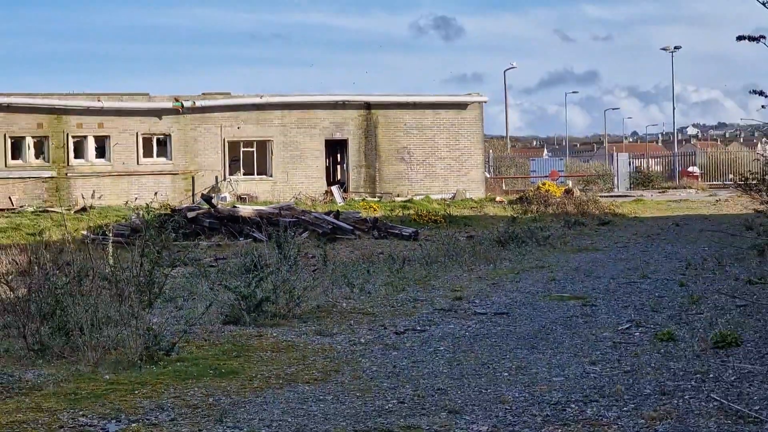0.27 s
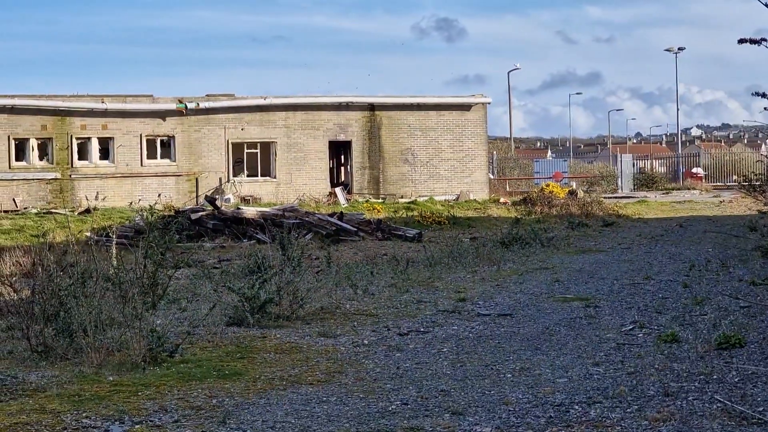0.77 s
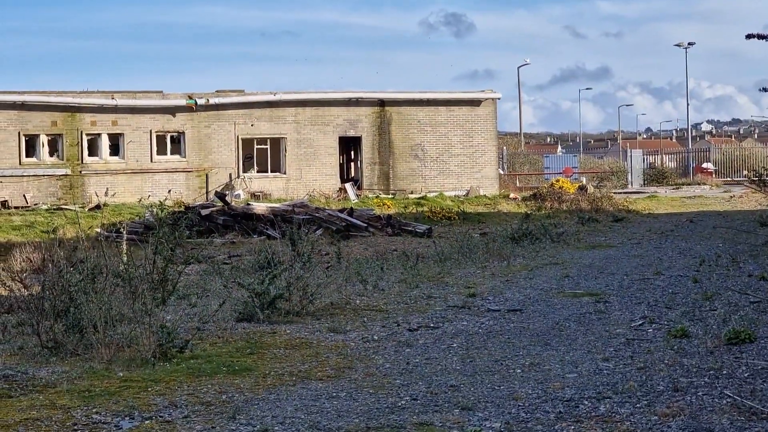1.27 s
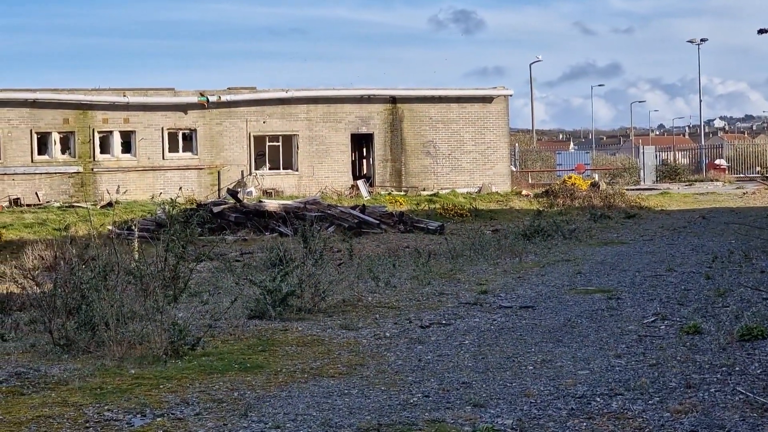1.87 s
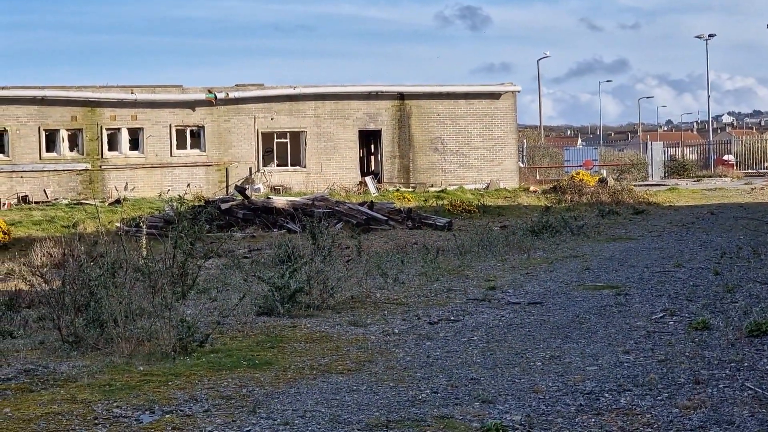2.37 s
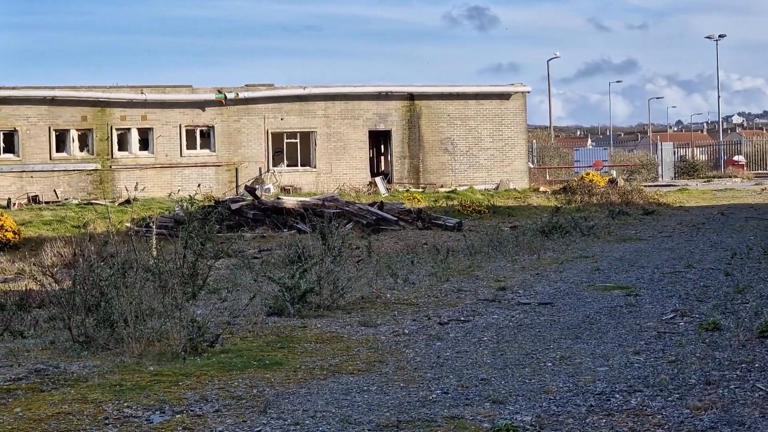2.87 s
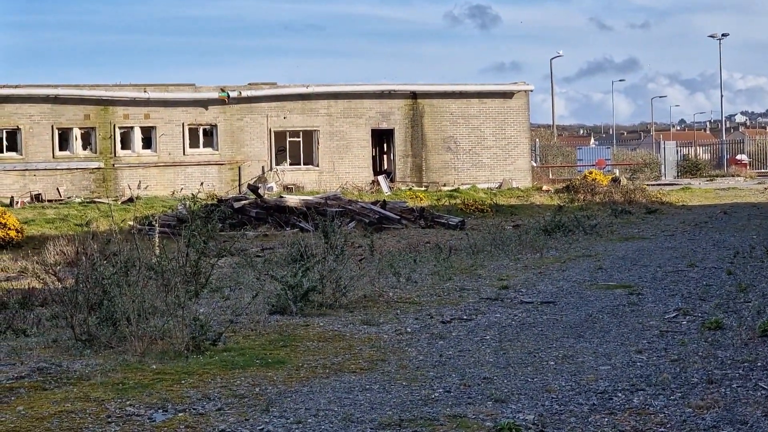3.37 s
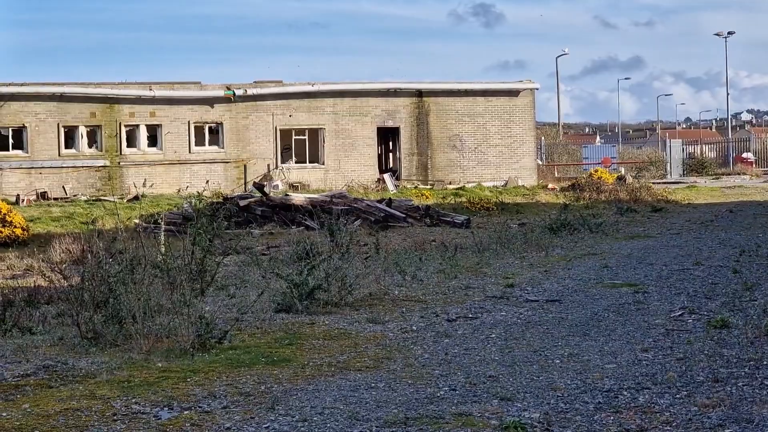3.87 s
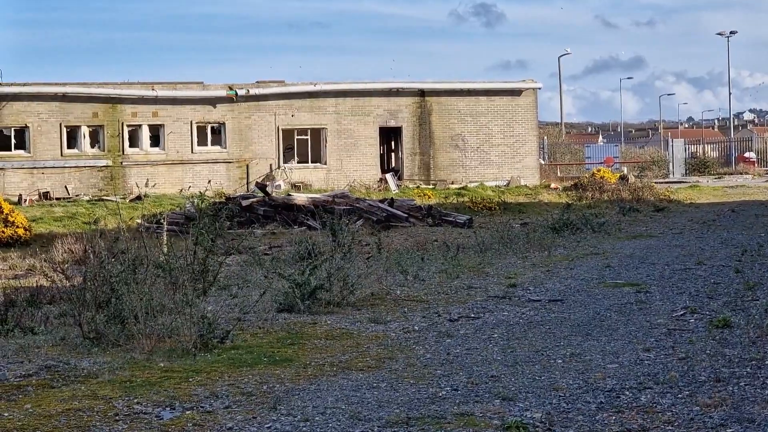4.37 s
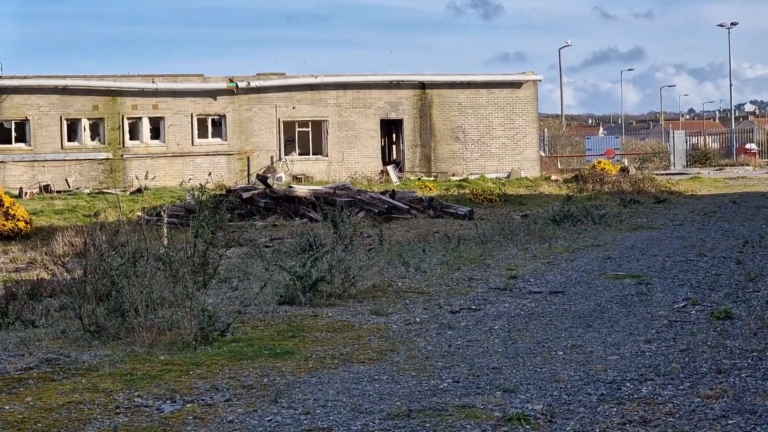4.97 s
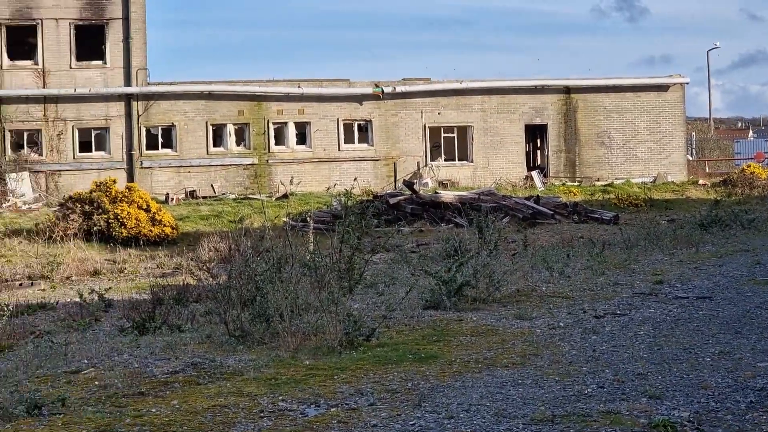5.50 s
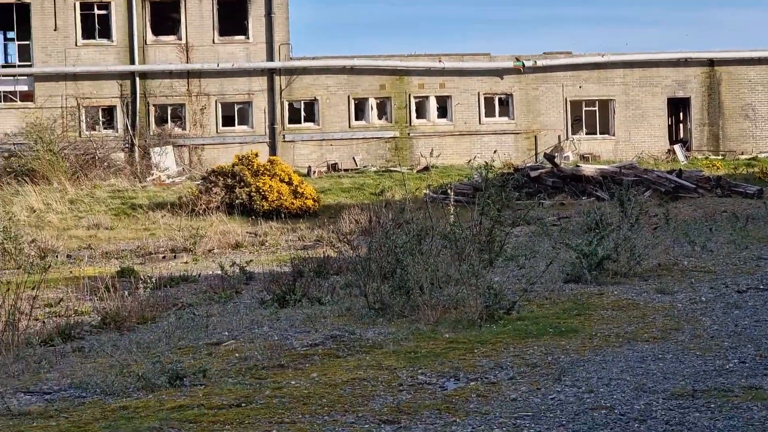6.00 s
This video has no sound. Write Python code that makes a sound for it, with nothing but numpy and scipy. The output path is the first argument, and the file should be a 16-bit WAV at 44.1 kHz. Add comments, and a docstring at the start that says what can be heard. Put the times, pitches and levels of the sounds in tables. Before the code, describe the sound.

A windy open yard beside derelict buildings, heard from a hand-held stereo phone. Low, uneven wind rumble starts immediately, with soft thumps jumping between left and right, and a faint distant shore wash beneath. From about 0.2 s gulls cry in a dense, restless chatter: short harmonic yelps that leap up, sometimes crack, then slide down, each a fraction of a second. Low, nearly pure clucks and grainy rasps fill the gaps, with many fainter birds behind and a short echo from the walls. Strong cries cluster around 1.7 to 3.5 s. A dull tap lands on the case near 0.6 s, another at 3.6 s, and two hard, clicky knocks at 4.5 to 4.6 s. Cloth hiss at the right is more noticeable after 3.9 s. Small muffled taps continue from 5 s; the last yelps come near 5.8 s, then clucks and wind to the end, just after 6 s.

```python
"""Dozens of gull cries from derelict roofs, off to the left of a hand-held phone.
From the start wind rumbles and thumps at both microphone ports, cloth hisses by the right one on and off,
and a far shore washes underneath. From about 0.2 s the gulls cry: harmonic voices leap up and slide down,
with low clucks, noisy rasps, fainter far birds and wall echoes. Decaying sines and noise make the taps on
the case, which start near 0.6 s; two hard ones come near 4.6 s. After the last cries, near 5.8 s, clucks end it."""
import sys
import numpy as np
from scipy import signal
from scipy.fft import rfft, irfft
from scipy.io import wavfile
from scipy.ndimage import uniform_filter1d

SR = 44100
rng = np.random.default_rng(int(sys.argv[2]) if len(sys.argv) > 2 else 0)


def inscribe(sig):
    """Save sig as 16-bit PCM at rate SR to the path in sys.argv[1].

    A 1-D sig is mono; a 2-D sig holds one channel per row.
    Samples are clipped to [-1, 1] before scaling.
    """
    pcm = np.round(np.clip(np.atleast_2d(sig).T, -1, 1) * 32767)
    wavfile.write(sys.argv[1], SR, pcm.astype(np.int16))


N = 275175
T = np.arange(N) / SR

# Near cries, levels before the stress and the throat filter: start_s, climb_ms, slide_ms, start_hz,
# break_hz (sudden jump up into the top), top_hz, drop_hz (quick fall after the top), end_hz,
# fundamental_top_db, fundamental_end_db, overtones_minus_fundamental_top_db and _end_db,
# third_minus_second_partial_db, higher_partials_minus_overtones_db
NEAR_CRIES = [ (.185, 31, 240, 1327, -1, 1421, 1.5, 961, -53, -47, 1.5, -19.5, -3, -21.5),
              (0.273, 3.6, 177, 1354, -3, 1315, 9.5, 1191, -61.5, -70, 12.5, 12, -18, -47),
              (.395, 35, 194, 1311, 208, 1601, 113.5, 1150, -44, -54.5, -21, -3.5, -3, -17),
              (0.498, 4, 69, 1615, 0, 1620, 2, 1457, -58, -54, -13, -13.5, 5, -17),
              (0.563, 3.9, 64, 1182, -4, 1218, -2, 957, -55.5, -48, -1.5, -13, 2, -30),
              (.61, 21, 60, 1488, 0, 1528, -2, 1356, -41.5, -49.5, -18, -5.5, -2.5, -14.5),
              (0.703, 45, 131, 1250, -4.5, 1546, 66.5, 1208, -41, -57, -11, 1, 0, -19),
              (0.918, 2.6, 71, 1211, 9, 1236, -2.5, 1145, -52, -54.5, -5.5, 3, -7.5, -19),
              (1.001, 2.7, 99, 1266, 6, 1273, 3, 1178, -52.5, -61.5, -8, -1, -3.5, -33),
              (1.12, 32, 245, 1273, 257, 1632, 148, 1147, -43, -61.5, -14, -12, -0.5, -19),
              (1.562, 50, 130, 1194, 2, 1544, 42, 1267, -46.5, -48, -7.5, -6, -3, -23.5),
              (1.765, 33, 148, 1275, 183, 1559, 89.5, 1271, -38, -46, -8.5, -15.5, -1.5, -18.5),
              (1.838, 5.6, 70, 1247, -2, 1247, -6.5, 1180, -65, -63.5, 10.5, 10.5, -1, -35),
              (1.957, 68, 232, 931, -2, 1533, 133, 1090, -40, -53.5, -7.5, -3, -2.5, -19.5),
              (2.294, 41, 110, 1244, 87, 1358, -9.5, 1240, -44.5, -45.5, -9, -5, -11, -25),
              (2.348, 27, 83, 1446, 3.5, 1546, 54.5, 1373, -42, -46.5, -11, 1.5, -5.5, -24),
              (2.46, 35, 196, 1255, 248, 1590, 156.5, 1169, -36.5, -55.5, -14, 3, -0.5, -20.5),
              (2.545, 45, 130, 1134, 128, 1386, 1, 1199, -49, -56.5, -2, -3, -7, -27),
              (2.737, 30, 184, 900, 6, 1387, 34.5, 1128, -40, -46.5, -5, -1.5, -6, -25.5),
              (2.972, 53, 160, 1226, 79, 1353, -28, 1190, -37.5, -54.5, -12, 1.5, -6, -23.5),
              (3.054, 30, 137, 1458, 0, 1526, 3, 1322, -42.5, -46, -16, -4, 0.5, -16),
              (3.322, 25, 81, 1374, 4, 1405, 24.5, 1260, -46, -51, -14, -11, -1, -17),
              (3.328, 32, 69, 1296, 242.5, 1578, 114, 1374, -42, -45, -18, -19.5, -2.5, -23),
              (3.432, 5, 190, 1320, 3.5, 1345, -1.5, 1117, -45.5, -52.5, -9, -8.5, 1, -33),
              (3.655, 51, 164, 1253, 85, 1382, -2, 1210, -42, -49.5, -16, -3, -6, -24.5),
              (4.138, 45, 5.4, 915, -3.5, 1355, -4, 1536, -46, -45, -3.5, -6.5, -12, -23),
              (4.19, 4.7, 125, 1291, 0, 1330, -1.5, 1078, -48, -51, 0.5, -5.5, 1, -31),
              (4.244, 42, 135, 1181, 149, 1602, 139, 1242, -44.5, -49.5, -15.5, -3.5, -6, -13.5),
              (4.42, 3, 181, 1482, 2, 1462, 75, 1160, -44.5, -56, -9, -2.5, -4.5, -26),
              (4.917, 23, 73, 883, -2, 1385, 5, 1294, -49.5, -38.5, -14.5, -17, -1.5, -22),
              (4.983, 35, 65, 927, -0.5, 1265, 24, 1201, -49, -52.5, -11.5, 7.5, -11.5, -26),
              (5.02, 25, 189, 1552, 1.5, 1510, 113.5, 1169, -42.5, -59.5, -15, -6, -4.5, -14),
              (5.311, 2.6, 12, 1143, 0, 1192, -1, 1205, -53, -64, 5, 2, 7, -28),
              (5.337, 4.6, 56, 1430, 1, 1422, 3, 1335, -53.5, -47.5, -31, -23, -15, -4),
              (5.382, 17, 5.2, 1160, 6.5, 1165, 6, 1166, -64, -63.5, 10.5, 9, 9, -19),
              (5.411, 5.2, 70, 1636, 8, 1615, 86, 1423, -51.5, -58, -22, -24, -1, -3),
              (5.419, 4.4, 65, 1413, 4, 1385, 9, 1275, -53, -49.5, -24, -28, -6, -3),
              (5.699, 51, 174, 1181, 255.5, 1582, 132.5, 1159, -45, -47.5, -12, -7.5, -3, -12),
              (5.76, 34, 4.6, 1162, 2.5, 1255, 0, 1305, -43, -48, -3, -12, 2, -24), ]
# What a bird's throat and beak let through: pitch_hz, gain_db
THROAT_FILTER = [(350, -14), (650, 1.5), (1300, 1), (1900, 1.5), (2600, 0.5), (3250, 5.5), (4000, 0.5),
                 (4700, 1), (5500, 1), (6400, -3), (7300, 0.5), (8800, -12.5), (16000, -48.5)]
LEFT_LEAD_MS = 0.2  # usual time by which the left port hears the birds first
SCRATCH_S = .012  # scratchy lead-in before each voice


def undb(db):
    """Turn decibels into a plain factor."""
    return 10 ** (np.asarray(db) / 20)


def level(x, db):
    """Scale a sound to an average (rms) level in dB."""
    return x * undb(db) / np.sqrt(np.mean(x ** 2))


def colour(x, points):
    """Filter along the last axis by (Hz, dB) points joined on a log axis; outside them nearly nothing passes."""
    hz, db = np.transpose(points)
    f = np.maximum(np.arange(x.shape[-1] // 2 + 1) * SR / x.shape[-1], 1)
    gain_db = np.interp(np.log(f), np.log(hz), db, left=-90, right=-90)
    return irfft(rfft(x) * undb(gain_db), x.shape[-1])


def walk(rate, size=N):
    """Random wandering: values held for 1 / rate seconds and smoothed twice; spread near 1."""
    hold = int(SR / rate)
    steps = np.repeat(rng.standard_normal(size // hold + 1), hold)
    return 1.45 * uniform_filter1d(uniform_filter1d(steps, hold), hold)[:size]


def add(track, sound, s):
    """Mix a sound into a track from time s on."""
    i = max(int(s * SR), 0)
    track[..., i:i + sound.shape[-1]] += sound[..., :track.shape[-1] - i]


def ports_apart(pan_db):
    """Gains of the left and right port that differ by pan_db."""
    return undb(np.array([[pan_db], [-pan_db]]) / 2)


def shore():
    """A faint, unsteady, quickly wavering wash of surf and town: filtered noise partly shared by the ports."""
    # Tone of the wash: pitch_hz, density_db_per_hz (relative)
    wash_colour = [(88, -19.5), (150, -5), (464, -19), (881, -11.5), (1110, -20), (1280, -7.5), (1850, -25),
                   (3650, -34), (7490, -45), (9840, -57), (15700, -49.5)]
    wash = colour(rng.standard_normal((2, N)) + .5 * rng.standard_normal(N), wash_colour)
    waver_db = walk(0.26) + 2.82 * walk(4.014)
    return level(wash * undb(waver_db), -55)


def wind(shared=0.44, eddy_db=2.0, pop_db=3.5):
    """Eddies pound the two ports, partly together; the higher flapping comes in sharper pops."""
    # Gusts: time_s, level_db (below 130 Hz), left_minus_right_db, flapping_minus_level_db (above 130 Hz)
    gusts = [(0.0, -46, 17.5, 5.5), (0.15, -30, -5.5, -10.5), (0.29, -37.5, 8, -22.5),
             (0.55, -34, 5.5, -11.5), (0.709, -30, -0.5, -19.5), (1.0, -42, 0.5, -26),
             (1.29, -30.5, -9.5, -15.5), (1.35, -43.5, -4, -10), (1.78, -34.5, 1.5, -23),
             (2.14, -37.5, -2, -17.5), (3.19, -33, -0.5, -22), (3.33, -28.5, 10, -20),
             (3.43, -37, -12, -23), (3.52, -41.5, 22.5, -22), (3.83, -36.5, -11.5, -9),
             (3.95, -31, -4, -6.5), (4.16, -52.5, -1, -7.5), (4.3, -33, 1, -7), (4.33, -40, 6.5, -19),
             (4.59, -31, 2.5, -12), (4.83, -40.5, 0, -39), (4.87, -34, 5.5, -18), (5.18, -35, -6, -9),
             (5.3, -29.5, 10, -19.5), (5.4, -34, 14.5, -13), (5.47, -34, -1.5, -2.5),
             (5.82, -38, -11.5, -15.5), (5.939, -37.5, 19, -14), (6.11, -27.5, 6, -15),
             (6.2, -37.5, -5.5, -1.5)]
    # Tone of the pressure noise: pitch_hz, density_db_per_hz (relative)
    buffet_colour = [(8.8, -42), (15, -14.5), (48, 1), (78, 0.5), (112, -5), (355, -38), (600, -50),
                     (780, -70.5), (1320, -120)]
    s, *columns = np.transpose(gusts)
    db, pan_db, flapping_db = (np.interp(T, s, c) for c in columns)
    together = np.sqrt(shared) * rng.standard_normal(N)
    apart = np.sqrt(1 - shared) * rng.standard_normal((2, N))
    air = colour(together + apart, buffet_colour)
    eddies = 0.4 * walk(25) + np.array([walk(25), walk(24.954)])
    low = signal.sosfiltfilt(signal.butter(4, 130, fs=SR, output="sos"), air)
    rumble = level(low * undb(eddy_db * eddies), 0)
    flapping = level((air - low) * undb(pop_db * eddies), 0) * undb(flapping_db)
    return (rumble + flapping) * undb([db + pan_db / 2, db - pan_db / 2])


def thumps():
    """Single hard eddies thump the ports: each is little more than one swing of pressure."""
    # Thumps: time_s (middle), peak_db (about, mean of both ports), pitch_hz, left_minus_right_db
    eddy_hits = [(0.069, -22.5, 88.5, 19), (0.164, -27, 62.6, 6), (0.591, -18, 97, 0),
                 (0.679, -18.5, 89, -28), (1.276, -22, 69.5, 3), (1.761, -24, 80.5, 6),
                 (1.863, -24, 86, 18), (2.614, -24, 69.5, 12), (2.771, -24, 84, -10),
                 (3.087, -22, 79.7, -12), (3.579, -23.5, 79.5, 9), (3.978, -24.5, 88, 12),
                 (4.284, -19.5, 78.6, 8), (4.55, -18.5, 79.5, 5), (4.599, -24.5, 76, 18),
                 (5.049, -22.5, 130, 10), (5.17, -26, 85, -20), (5.286, -26, 80, 24),
                 (5.475, -25.5, 99, -10), (6.099, -21, 72, 6)]
    width_cycles = 0.38  # width of the bell-shaped swell
    out, t = np.zeros((2, N)), np.arange(-2048, 2048) / SR
    for s, db, hz, pan_db in eddy_hits:
        bell = np.exp(-.5 * (t * hz / width_cycles) ** 2)
        swing = np.cos(2 * np.pi * (hz * t + rng.random())) * bell
        ports = ports_apart(pan_db)
        add(out, swing * undb(db) * ports / ports.mean(), s + t[0])
    return out


def rustle(left_db=-10, grain_db=1.5):
    """Cloth fibres slide past the right port: broad hiss with a fine grain, weaker on the left."""
    # Strength of the rubbing: time_s, level_db (band 11.5 to 15.5 kHz, mean of the two ports)
    rubbing = [(0.0, -84), (0.65, -99), (0.79, -79), (0.91, -76), (1.25, -100), (1.35, -80), (1.74, -89),
               (1.86, -82), (2.03, -84), (2.17, -94.5), (2.97, -106), (3.15, -82.5), (3.56, -95),
               (3.88, -77), (3.98, -95), (4.12, -72.5), (4.21, -76), (4.24, -85), (4.31, -76.5),
               (4.75, -72.5), (4.8, -82.5), (5.349, -80.5), (5.42, -77.5), (5.64, -90.5), (5.78, -72.5),
               (6.07, -91.5), (6.14, -109)]
    # Tone of the hiss: pitch_hz, density_db_per_hz (relative)
    cloth_colour = [(300, -20.5), (2000, 8.5), (6000, 0), (9000, -6), (10500, -14.5), (12000, -6.5),
                    (15500, -5.5)]
    s, db = np.transpose(rubbing)
    grainy = rng.standard_normal((2, N)) * undb(grain_db * walk(300))
    hiss = colour(grainy, cloth_colour) * undb([[left_db], [0]])
    top_band = colour(hiss.mean(axis=0), [(11500, 0), (15500, 0)])
    return hiss / top_band.std() * undb(np.interp(T, s, db))


def taps():
    """Fingers tap the case: each tap is a dull thud, a short knock and a sharp tick that die away fast."""
    # Taps, strengths before the fades: time_s, knock_db, thud_db, tick_db, left_minus_right_db
    finger_taps = [(0.556, -43, -31, -66, -1), (3.6055, -50, -33.5, -64, -1), (3.8644, -73, -60, -52, 10),
                   (4.5315, -33.5, -32.5, -41.5, -5), (4.6315, -28.5, -40, -33, -7),
                   (4.97, -70, -54, -56, -10), (5.1737, -56, -33, -65, -12), (5.897, -50, -42, -68, -6),
                   (5.468, -61, -36, -62, 11), (5.5553, -61, -29.5, -70, -2), (5.9546, -63, -38, -68, -24),
                   (6.0744, -62, -35, -70, 0), (5.742, -54, -32, -70, -6), (5.915, -67, -37, -70, 1.5)]
    out, t = np.zeros((2, N)), np.arange(1024) / SR
    thud = np.sin(2 * np.pi * 420 * t) * np.exp(-t / 0.00089) * (1 - np.exp(-t / 0.00013))
    knock = np.sin(2 * np.pi * 3000 * t) * np.exp(-t / 0.00048)
    for s, knock_db, thud_db, tick_db, pan_db in finger_taps:
        noise = 0.17 * rng.standard_normal(len(t))
        tick = (np.sin(2 * np.pi * 6100 * t) + noise) * np.exp(-t / 0.00063)
        tap = undb(thud_db) * thud + undb(knock_db) * knock + undb(tick_db) * tick
        add(out, tap * ports_apart(pan_db), s)
    return out


def yard(dry, t60_s=0.36, yard_db=-13.5):
    """Walls and ground scatter the cries into a short tail of fading noise, thin in the lows, unlike at each port."""
    t = np.arange(int(.8 * SR)) / SR
    tail = rng.standard_normal((2, len(t))) * undb(-60 * t / t60_s) * (t > .015)
    tail = colour(tail, [(300, -21.5), (2000, -8.0), (4000, -8.0), (16000, -6.5)])
    tail *= undb(yard_db) / np.sqrt(np.sum(tail ** 2, axis=1, keepdims=True))
    return signal.fftconvolve(dry, tail, axes=1)[:, :N]


def echoed(sound, db, count=4):
    """Add a few close echoes, 4 to 22 ms late; they notch a sliding partial into pieces. Energy is kept."""
    lags = (SR * .004 * 5.5 ** rng.random((count, 2))).astype(int)
    out = np.pad(sound, ((0, 0), (0, lags.max())))
    for pair in lags:
        for side, lag in enumerate(pair):
            out[side, lag:lag + sound.shape[1]] += undb(db) / 2 * sound[side]
    return out * np.sqrt(np.sum(sound ** 2) / np.sum(out ** 2))


def cry(rows, third_db, upper_db, lead_ms, count=6, wobble=0.0045, hoarse=0.049, flutter_db=2.5,
        over_flutter_db=3.5, upper_flutter_db=6.0, scratch_db=-12, breath_db=-21):
    """A harmonic voice: the syrinx scratches before it locks and in fast leaps; the left port hears it first."""
    # Offsets of partials 4 to 7 from the higher-partials level: gain_db
    upper_offsets = [1.5, -1.5, -6, -8]
    s, *columns = np.transpose(rows)
    t = np.arange(s[0] - SCRATCH_S, s[-1] + 0.015, 1 / SR)
    hz, db, over_db = (uniform_filter1d(np.interp(t, s, c), 200, mode="nearest") for c in columns)
    loose = np.clip((s[0] - t) / 0.0047 + 1, 0, 1)
    leap = np.clip(np.gradient(np.log(hz)) * SR / 12, 0, 1)
    over_db = over_db - 9 * leap

    # unlocked membranes: the cycle timing stumbles, which smears every partial into noise
    stumble = (hoarse + .4 * np.maximum(loose, leap)) * walk(700, size=len(t))
    # the pitch scoops up into the note
    scoop = 1 - .07 * np.clip((s[0] + .004 - t) / SCRATCH_S, 0, 1)
    hz = hz * scoop * (1 + wobble * walk(149.8, size=len(t)))
    # the birds sit at slightly different bearings
    right_delay_s = (lead_ms + 0.023 * rng.standard_normal()) / 1000
    cycles = np.cumsum(hz) / SR - np.outer([0, right_delay_s], hz) + rng.random()
    phase = 2 * np.pi * cycles + stumble

    tone = np.sin(phase) * undb(flutter_db * walk(37.1, size=len(t)))
    # partials 2 and 3 share the overtone level between them
    second_db = -10 * np.log10(1 + undb(2 * third_db))
    shares_db = [second_db, second_db + third_db, *(upper_db + np.array(upper_offsets))]
    for k, share_db in enumerate(shares_db[:count]):
        depth_db = over_flutter_db if k < 2 else upper_flutter_db
        partial_db = over_db + share_db + depth_db * walk(47.3, size=len(t))
        tone += np.sin((k + 2) * phase) * undb(partial_db)
    # air puffs through the membranes once a cycle, as strong as the overtones allow
    puff = uniform_filter1d(rng.standard_normal(len(t)), size=8)
    tone += puff * (1 + np.sin(phase)) * undb(over_db + breath_db)

    fade = np.clip(np.minimum((t - t[0]) / .024, (t[-1] - t) / .02), 0, 1)
    ports = ports_apart(.8 * rng.standard_normal())
    return np.sqrt(2) * tone * fade * undb(db + scratch_db * loose) * ports


def far_birds(count=190, loudest_db=-57.0, over_db=-9):
    """Many fainter cries cluster around the starts of the near ones: each leaps up, then slides down."""
    out = np.zeros((2, N))
    for who, wait, pitch, long, faint in rng.random((count, 5)):
        hz, length_s = 800 * 1.85 ** pitch, .05 + .15 * long
        db = loudest_db - 10 * faint
        rows = [(0, .93 * hz, db - 3, over_db),
                (.15 * length_s, hz * 1.05, db, over_db),
                (length_s, .85 * hz, db - 4, over_db)]
        near_start_s = NEAR_CRIES[int(who * len(NEAR_CRIES))][0]
        voice = cry(rows, -5.5, -21.0, LEFT_LEAD_MS, count=2, wobble=0.01195)
        add(out, voice, near_start_s + .25 * wait - .08)
    return colour(out, THROAT_FILTER)


def rasps(grain_db=-1.0):
    """Unlocked membranes rattle where a voice starts or cracks: grainy noise that swells and stops."""
    # Rasps: start_s, length_ms (the soft swell is 1.4 times as long), level_db (at the top of the swell)
    rasp_times = [(.41, 56, -53), (.71, 44, -60), (.885, 43, -51.5), (1.755, 33, -40), (1.795, 17, -42),
                  (1.96, 20, -52.5), (2.17, 39, -49), (2.455, 57, -47), (2.545, 49, -48.5),
                  (2.734, 17, -50), (2.959, 21, -46), (4.13, 41, -57), (4.26, 100, -50.5), (4.99, 36, -49),
                  (5.745, 33, -50)]
    # Tone of the rattle: pitch_hz, density_db_per_hz (relative)
    rasp_colour = [(900, -18), (1500, -1.5), (2100, -2.5), (4000, 1), (6000, -17.5), (8500, -22)]
    gate = np.zeros(N)
    for s, ms, db in rasp_times:
        add(gate, undb(db) * np.hanning(int(1.4 * ms * SR / 1000)), s - .2 * ms / 1000)
    grainy = rng.standard_normal(N) * undb(grain_db * walk(600))
    rattle = level(colour(grainy, rasp_colour), 0) * gate
    return np.array([rattle, np.roll(rattle, int(LEFT_LEAD_MS * SR / 1000))])


def clucks(over_db=-18.0, third_db=-4.5, upper_db=-14, echo_db=-9):
    """Low, almost pure voices that glide straight from one pitch to another."""
    # Clucks, levels before the throat filter: start_s, length_ms, start_hz, end_hz, start_db, end_db
    glides = [ (0.159, 31, 807, 1037, -50, -48), (.46, 40, 845, 747, -42.5, -50),
              (.58, 91, 914, 672, -38, -68), (0.711, 36, 920, 915, -47, -52),
              (.91, 70, 1025, 757, -41, -50), (1.122, 38, 996, 925, -50, -56),
              (1.329, 44, 928, 830, -51, -61), (1.78, 27, 846, 918, -37.5, -43.5),
              (1.815, 23, 879, 707, -43, -50.5), (1.97, 50, 896, 723, -51.5, -59),
              (2.09, 99, 554, 485, -60.5, -59.5), (2.169, 41, 1072, 875, -39, -41.5),
              (2.235, 48, 908, 776, -34, -50), (2.471, 41, 873, 910, -41.5, -67.5),
              (2.543, 21, 998, 760, -35, -53), (2.698, 63, 1033, 656, -42, -48),
              (2.773, 33, 852, 793, -40.5, -45), (2.968, 55, 881, 722, -44, -58.5),
              (3.432, 30, 1100, 846, -41, -55), (3.464, 35, 880, 800, -42, -54.5),
              (3.632, 27, 1064, 740, -52, -48.5), (4.305, 40, 937, 860, -41, -42),
              (4.439, 44, 1015, 708, -49.5, -52.5), (4.621, 25, 994, 890, -38, -65.5),
              (4.737, 25, 1094, 1078, -57, -49.5), (4.785, 32, 1270, 1188, -50, -54),
              (5.109, 40, 936, 848, -45.5, -52), (5.167, 80, 1065, 791, -47.5, -43.5),
              (5.319, 47, 966, 910, -50, -59.5), (5.496, 80, 967, 885, -40.5, -51),
              (5.901, 74, 937, 792, -51, -56), (6.205, 28, 930, 1200, -56, -51), ]
    out = np.zeros((2, N))
    for start, ms, hz, end_hz, db, end_db in glides:
        rows = [(start, hz, db, over_db), (start + ms / 1000, end_hz, end_db, over_db)]
        voice = cry(rows, third_db, upper_db, LEFT_LEAD_MS, count=4)
        add(out, echoed(voice, echo_db), start - SCRATCH_S)
    return colour(out, THROAT_FILTER)


def contour(start, climb_ms, slide_ms, start_hz, break_hz, top_hz, drop_hz, end_hz,
            db, end_db, over_db, over_end_db):
    """A cry in 2 ms steps (s, Hz, dB, overtones dB): climb, perhaps a break, a quick drop, a straight slide."""
    drop_s, stress_db, stress_s = 0.01777, 3.5, 0.1  # the stress on the top dies away
    ms = np.arange(-max(climb_ms, 1), max(slide_ms, 1), 2)  # counted from the top
    left = np.maximum(ms / ms[0], 0)  # share of the climb still to go
    after_s = np.maximum(ms, 0) / 1000
    slid = np.maximum(ms, 0) / max(slide_ms, 1)

    # the climb rounds off towards the pitch just below the break
    below_break_hz = top_hz - break_hz
    climb = below_break_hz + (start_hz - below_break_hz) * left ** 2.8
    slide = top_hz - drop_hz * (1 - np.exp(-after_s / drop_s)) + (end_hz - top_hz + drop_hz) * slid
    hz = np.where(ms < 0, climb, slide)

    loud = db + (end_db - db) * slid + stress_db * np.exp(-after_s / stress_s)
    # softer by 7.5 dB for each octave the climb is away from its goal
    loud = loud - 7.5 * np.abs(np.log2(below_break_hz / climb))
    # brighter ahead of a big break
    bright = over_db + (over_end_db - over_db) * slid + 13.5 * left * (break_hz > 40)
    return np.transpose([start + (ms - ms[0]) / 1000, hz, loud, bright])


def near_cries():
    """The near birds: each cry follows its pitch path, gets echoes off roofs and ground, and passes the throat."""
    # Birds on other perches take over: time_s, echoes_db (four together, against the cry), left_lead_ms
    perches = [(.2, -8, 0.27), (.5, -3.5, 0.17), (1.0, -6, 0.22), (1.56, -6, 0.17), (1.8, -11, 0.21),
               (2.0, -5, .19), (2.5, -4.5, .2), (2.75, -21, 0.26), (3.0, -9.5, 0.24), (3.65, -5.5, 0.22),
               (4.4, -6.5, 0.22), (5.7, -5, .17)]
    out = np.zeros((2, N))
    s, *columns = np.transpose(perches)
    for *shape, third_db, upper_db in NEAR_CRIES:
        start = shape[0]
        echo_db, lead_ms = (np.interp(start, s, c) for c in columns)
        voice = cry(contour(*shape), third_db, upper_db, lead_ms)
        add(out, echoed(voice, echo_db), start - SCRATCH_S)
    return colour(out, THROAT_FILTER)


def shaded(birds):
    """The case shades each port differently: half of the difference goes to each side."""
    # Shading: pitch_hz, left_minus_right_db
    port_difference = [(300, -1.5), (1300, 0), (2600, -2.5), (4000, 2.5), (16000, 1.5)]
    return np.array([colour(port, [(hz, half * db) for hz, db in port_difference])
                     for port, half in zip(birds, (.5, -.5))])


def scene():
    """Gulls and their wall echoes over wind, cloth, taps and the far shore."""
    near = near_cries() + clucks() + rasps()
    far = far_birds()
    # the walls get the far birds stronger than the ports do
    birds = near + far + yard(near + 2.96 * far)
    return shore() + wind() + thumps() + rustle() + taps() + shaded(birds)


def record(dry):
    """The phone cuts the top: a steep low-pass at 15760 Hz."""
    return signal.sosfilt(signal.ellip(10, .2, 80, 15760, fs=SR, output="sos"), dry)


dry = scene()
out = record(dry)
inscribe(out)
```